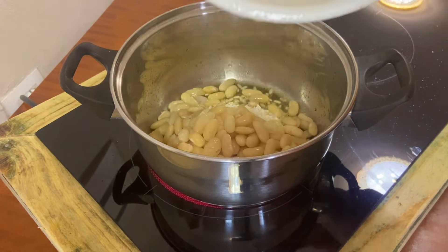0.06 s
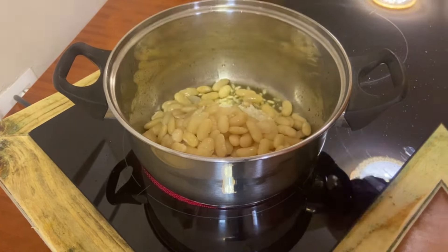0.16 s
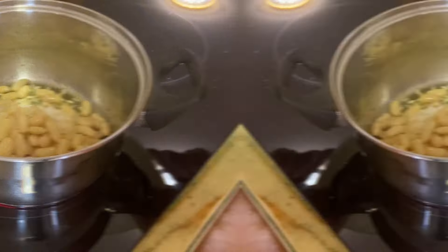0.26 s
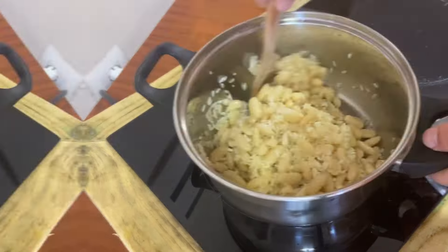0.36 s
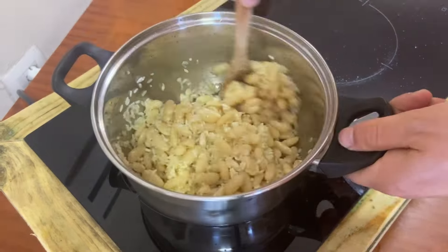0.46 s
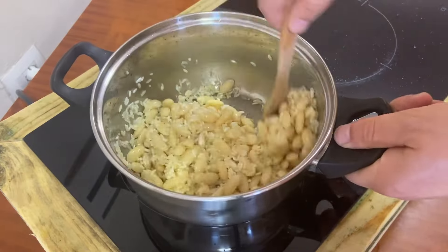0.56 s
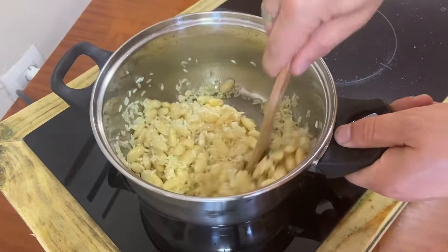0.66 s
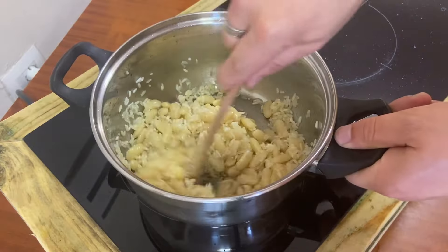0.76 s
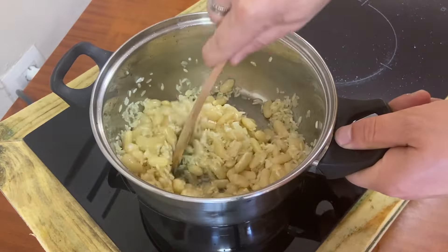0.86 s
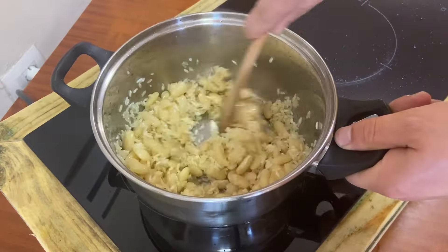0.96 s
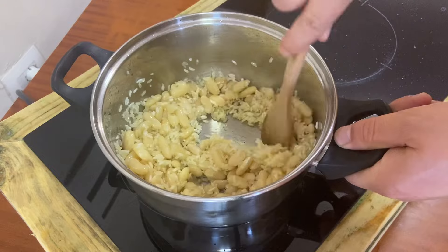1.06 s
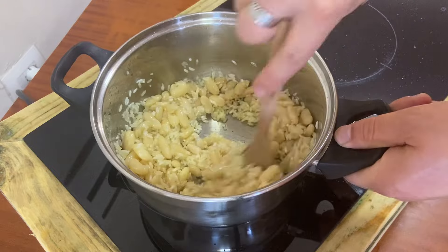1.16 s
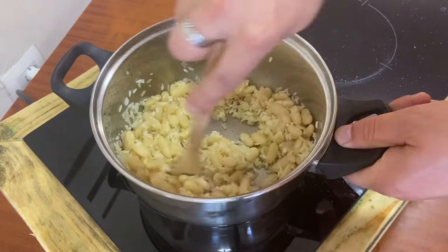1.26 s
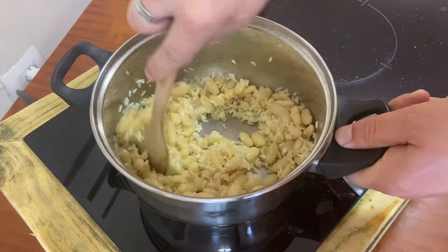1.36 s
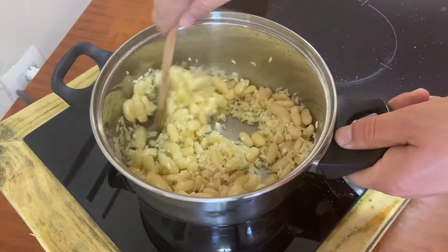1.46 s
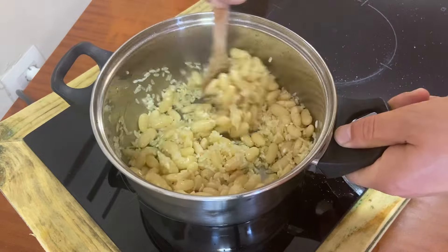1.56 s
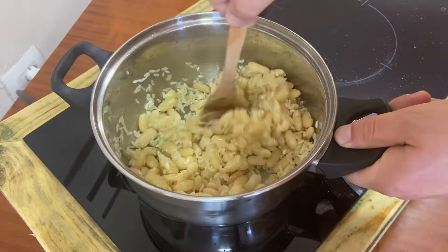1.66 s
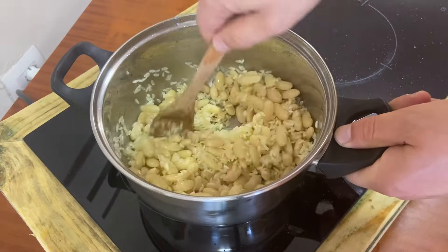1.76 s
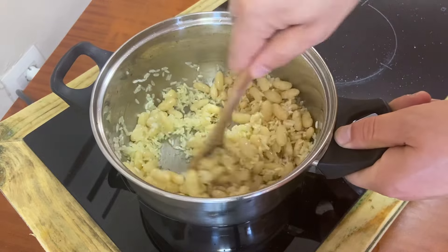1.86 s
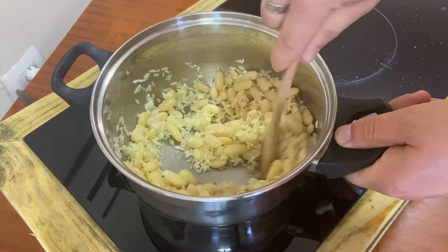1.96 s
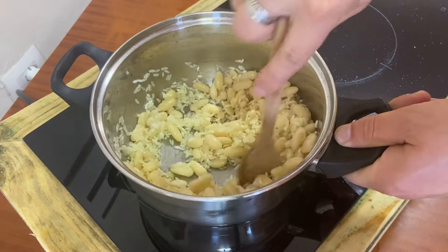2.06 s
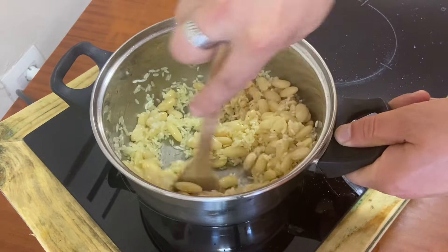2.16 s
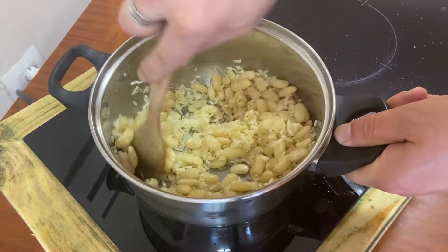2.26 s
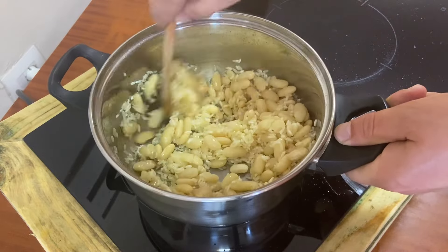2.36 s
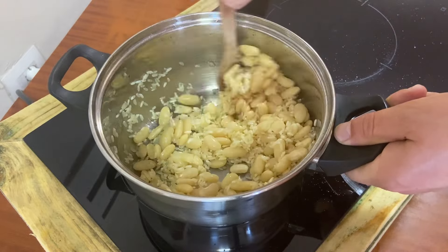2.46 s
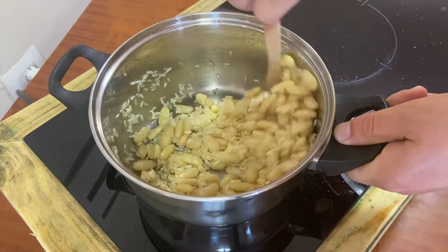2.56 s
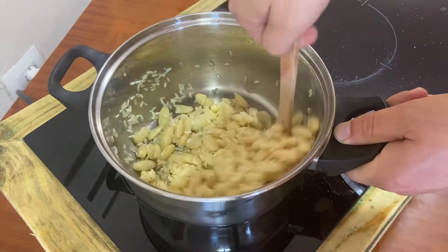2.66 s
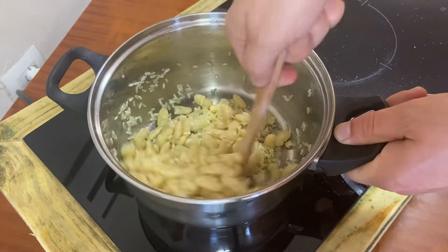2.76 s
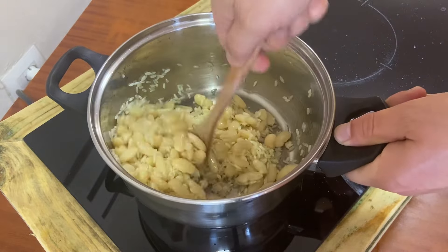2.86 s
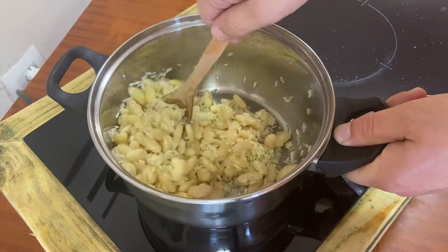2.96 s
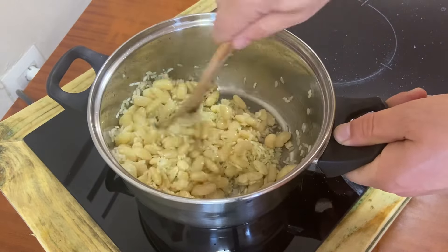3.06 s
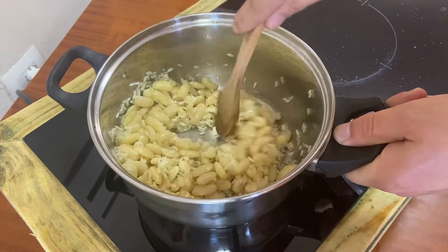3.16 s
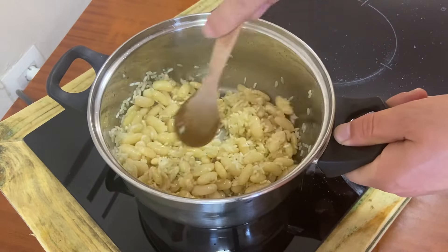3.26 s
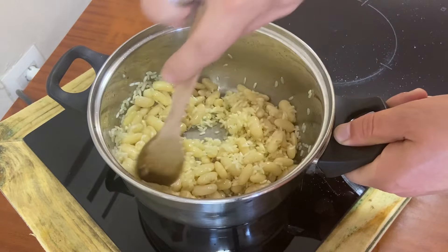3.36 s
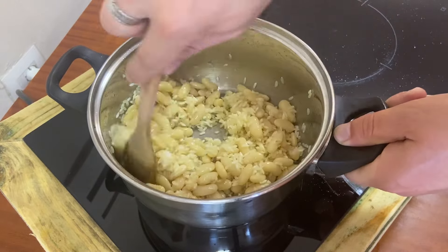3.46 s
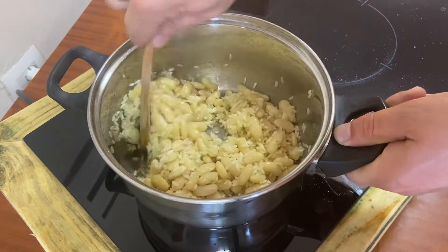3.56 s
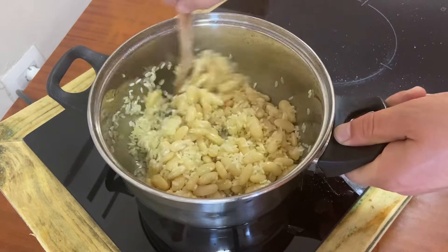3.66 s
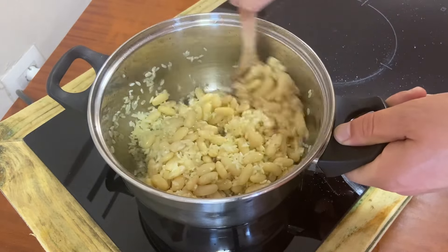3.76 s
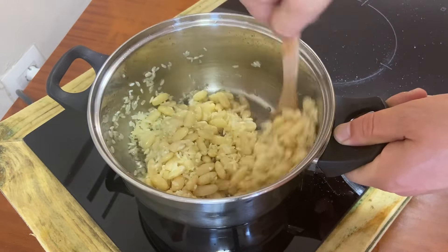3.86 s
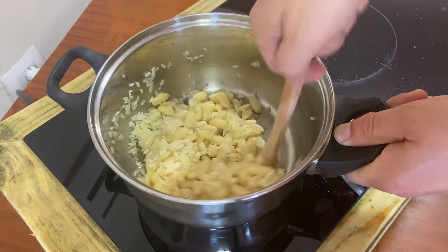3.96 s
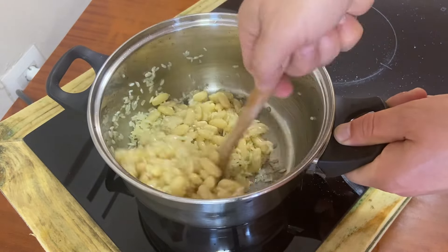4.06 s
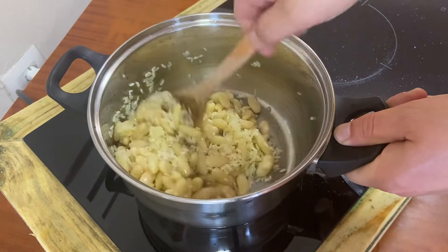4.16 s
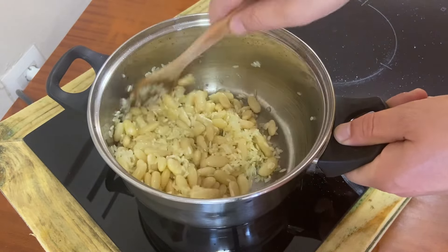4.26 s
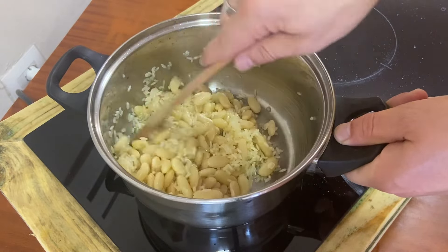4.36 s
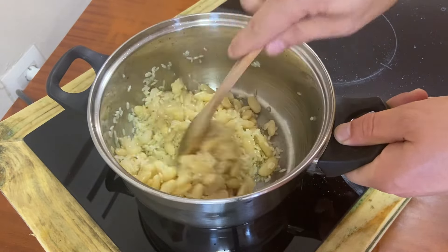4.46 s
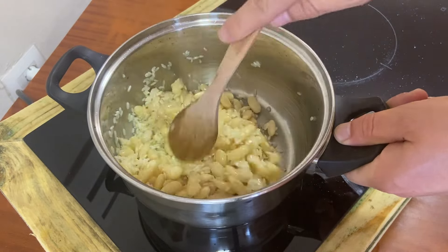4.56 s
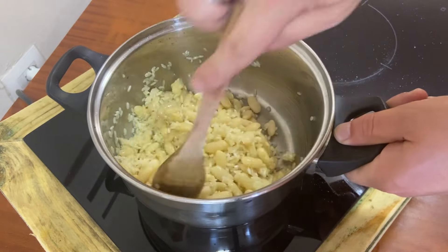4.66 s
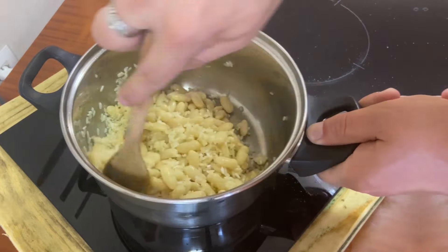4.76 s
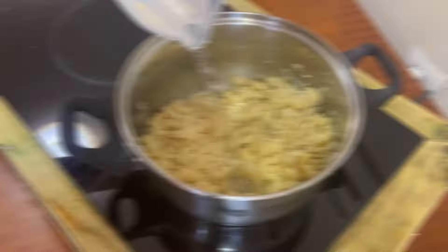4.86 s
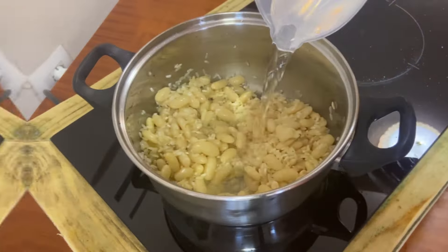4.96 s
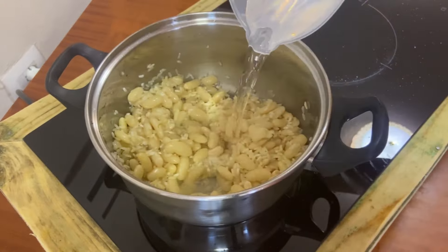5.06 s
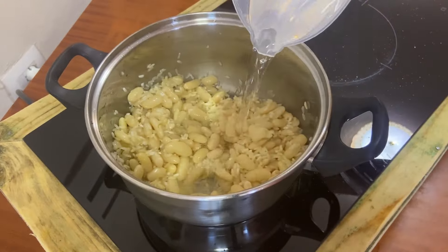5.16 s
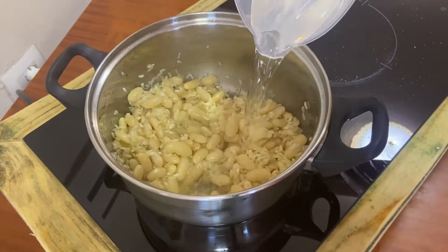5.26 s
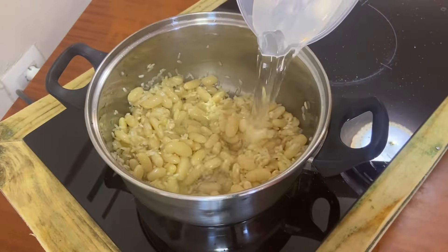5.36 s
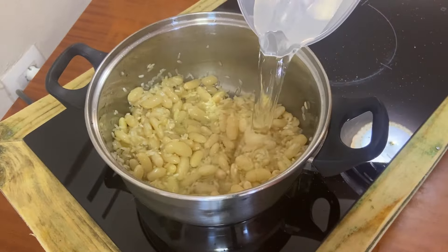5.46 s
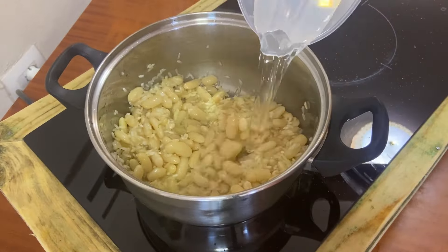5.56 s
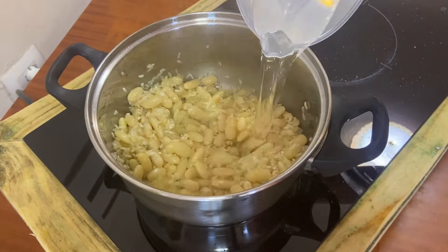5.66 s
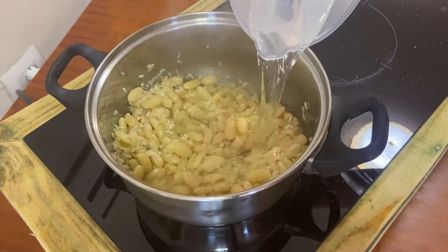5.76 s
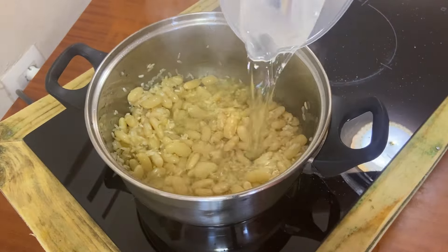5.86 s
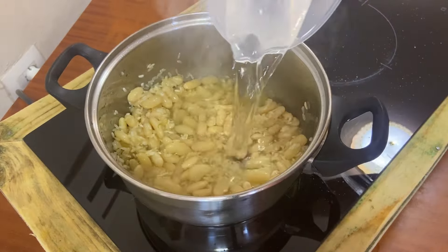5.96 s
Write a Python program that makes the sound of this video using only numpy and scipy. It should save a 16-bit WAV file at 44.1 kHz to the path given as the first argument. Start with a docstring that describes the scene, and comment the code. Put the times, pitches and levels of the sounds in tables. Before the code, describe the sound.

Beans and rice sizzle and crackle in hot oil while a wooden spoon scrapes and taps a steel pot, then poured water hisses into steam.

```python
"""Rice and beans fry in oil in a steel pot: bursts of tiny steam bubbles make a dense crackle, with louder spits.
A wooden spoon stirs: grains scrape the steel, struck modes ring for taps on the wall and nudges on the hob.
Then poured water flashes to steam in a thick hiss, with boiling, splashing and bubbles that rise in pitch.
It is heard in mono from just above the pot in a small kitchen, in three parts split by brief silences."""
import sys
import numpy as np
from scipy import signal
from scipy.fft import rfft, irfft, next_fast_len
from scipy.io import wavfile
from scipy.ndimage import uniform_filter1d, map_coordinates

SR = 44100
rng = np.random.default_rng(int(sys.argv[2]) if len(sys.argv) > 2 else 0)


def dump_mix(stems):
    """Bounce the given channels to the path in sys.argv[1] as a 16-bit WAV at rate SR."""
    frames = np.atleast_2d(stems).T  # one column per channel
    limited = np.clip(frames, -1, 1)  # hard clip at full scale
    pcm = np.round(limited * 32767).astype(np.int16)
    wavfile.write(sys.argv[1], SR, pcm)


N = 265129

# The oil left to itself, uneven but calming as the food dries.
# Each row: time in seconds, fine fizz in dB, coarse crackle in dB, both before flares and trims.
FRY_LEVELS = [(0.0, -46.5, -47.5), (0.07, -52, -51), (0.2, -49.5, -50.5), (0.32, -46.5, -48.5),
              (0.36, -54.5, -57.5), (0.7, -52.5, -56), (1.3, -48, -56.5), (1.45, -46.5, -53),
              (2.0, -49, -57.5), (2.8, -52, -64), (3.3, -49.5, -58.5), (3.9, -52, -61), (4.1, -53.5, -63),
              (4.88, -55.5, -60)]


def frying_levels(flare_db):
    """Wet food turned onto the hot steel flares the fine fizz most and the coarse crackle less; two curves in dB."""
    fine_db, coarse_db = curves(FRY_LEVELS)
    return fine_db + flare_db, coarse_db + 0.43 * flare_db


# Colour of the fine fizz. Each row: frequency in Hz, relative level in dB.
FIZZ_SPECTRUM = [(1500, -32.5), (3000, -7.5), (4500, -3), (6000, -1.5), (7400, 1.5), (9500, -2),
                 (12500, -1.5), (15800, -5.5)]
# Colour of the coarse crackle. Each row: frequency in Hz, relative level in dB.
CRACKLE_SPECTRUM = [(150, -11.5), (400, -10.5), (800, -8), (1100, -9.5), (1800, -3), (3000, 4),
                    (4200, -0.5), (6500, 5.5), (12000, -25)]


def frying(fine_db, coarse_db):
    """Moisture boils off in the oil, in clumps of fine and coarse bubbles with sharp ticks among them."""
    clumps = amp(1.3 * wobble(50) + 0.68 * wobble(14))
    # in a busy sizzle the ticks merge into the hiss, in a calm one they stand apart
    apart = amp(-0.6 * (fine_db - np.median(fine_db)))
    snaps = apart * ticks(count=700, spread_db=9.0, life_ms=0.69)
    small = bursts(count=7500, spread_db=6.5, life_ms=0.34, hiss_db=2.5, rare=0.053)
    large = bursts(count=5000, spread_db=3.5, life_ms=0.57, hiss_db=-1, rare=0.052, size=64)
    fine = coloured(clumps * small + 1.15 * snaps, FIZZ_SPECTRUM)
    coarse = coloured(clumps * large + snaps, CRACKLE_SPECTRUM)
    return amp(fine_db + 0.73) * fine + amp(coarse_db - 1.3) * coarse


def ticks(count, spread_db, life_ms):
    """Oil films snapping: sparse broadband clicks, each a puff of noise that dies at once."""
    when, rank = rng.random((count, 2)).T
    strength = amp(-spread_db * np.log(rank + 0.15))
    starts = np.bincount((when * N).astype(int), strength, N)
    decay = np.exp(-1000 / (SR * life_ms))
    puffs = signal.lfilter([1], [1, -decay], starts)
    return unit(puffs * np.tanh(rng.standard_normal(N)))


# The loud spits of oil. Each row: start in seconds, level in dB before trim, pitch in Hz.
LOUD_SPITS = [(0.0155, -29, 8250), (0.0254, -39, 9760), (0.098, -40, 5870), (0.1521, -32, 10800),
              (0.1545, -30.5, 7600), (0.1588, -31, 9500), (0.2164, -39, 9200), (0.24, -40, 6060),
              (0.251, -26, 7600), (0.3549, -35, 6000), (0.3725, -29.5, 8450), (0.3746, -29, 8000),
              (0.5367, -37.5, 11400), (0.634, -44, 11400), (0.6884, -42, 10400), (0.7166, -41.5, 7600),
              (0.741, -40.5, 10100), (0.782, -37, 8440), (1.398, -32, 7200), (1.4006, -35, 7100),
              (1.498, -41, 7360), (1.5664, -37.5, 7200), (2.12, -37, 8900), (2.2327, -35, 9400),
              (2.5003, -42, 8800), (2.5739, -40, 6900), (2.7092, -42, 7000), (2.8162, -44, 8300),
              (2.845, -41, 8500), (3.1093, -37.5, 6600), (3.5689, -37, 7400), (3.7219, -39.5, 9500),
              (3.8853, -38.5, 7560), (4.114, -45, 14100), (4.1185, -49, 8300), (4.202, -44, 8300),
              (4.285, -48, 11000), (4.301, -40, 8150), (4.5582, -45, 8440)]
# Wet bubbles that ring as they open. Each row: start in seconds, starting pitch in Hz, level in dB.
WET_PLOPS = [(0.06, 2190, -35), (0.124, 4870, -29), (0.517, 3000, -31.5), (4.584, 3430, -39.5)]


def spits(fine_db):
    """A larger bubble snaps in a cycle or two and scatters a brief spray; wet ones ring with a rising pitch."""
    track, t = np.zeros(N), np.arange(SR // 50) / SR
    for s, db, hz in list(LOUD_SPITS) + stray_spits(fine_db, count=110):
        snap = np.sin(2 * np.pi * hz * t) * np.exp(-t / 0.00024)
        spray_fade = 0.033 * np.exp(-t / 0.0011) + 0.092 * np.exp(-t / 0.0028)
        pop = snap + spray_fade * rng.standard_normal(len(t))
        pop = pop / np.std(pop[:SR // 1000])  # even loudness over the first millisecond
        add(track, s, amp(db + 2.76) * pop)
    for s, hz, db in WET_PLOPS:
        rising = np.sin(2 * np.pi * hz * t * (1 + 12 * t))
        add(track, s, amp(db) * rising * np.exp(-t / 0.0012))
    low_hz = 2800  # so small a source radiates little bass
    return filtered(track, lambda f: 1j * f / (low_hz + 1j * f))


STRAY_OVER_DB, STRAY_SPREAD_DB = 4.5, 1.2  # level over the fizz curve before trim, scatter
STRAY_HZ, STRAY_OCTAVES = 9200, 0.71  # middle pitch and its scatter


def stray_spits(fine_db, count):
    """Lesser spits at random moments, stronger where the oil is busier: rows of start, level, pitch."""
    s = rng.random(count) * SILENCES[1][0]
    size, pitch = rng.standard_normal((count, 2)).T
    db = fine_db[(s * SR).astype(int)] + STRAY_OVER_DB + STRAY_SPREAD_DB * size
    return list(zip(s, db, STRAY_HZ * 2 ** (STRAY_OCTAVES * pitch)))


# Strokes of the spoon. Each row: time of full force in seconds, length in seconds, push on the pot in dB,
# scrape in dB (both before catches and trims), flare of the fine fizz in dB.
SPOON_STROKES = [(0.368, 0.054, -56, -58.5, 15.5), (0.498, 0.1, -62.5, -62, 3.5),
                 (0.733, 0.091, -63, -68, -1), (0.997, 0.081, -65, -62, 5), (1.037, .08, -62, -79, 1.5),
                 (1.281, 0.065, -62.5, -69, -3), (1.496, 0.22, -79, -70.5, 0.5),
                 (1.827, 0.27, -70, -68.5, 0.5), (1.993, 0.058, -70, -61.5, 0.5),
                 (2.225, 0.065, -68, -61, -0.5), (2.364, 0.049, -68, -56.5, 3.5),
                 (2.523, 0.31, -71, -68.5, 2), (2.685, 0.069, -62, -67, -1), (3.133, 0.084, -92, -75, 3),
                 (3.254, 0.036, -63, -69, 0.5), (3.433, 0.063, -57, -72, -1.5),
                 (3.645, 0.14, -68.5, -64, 2), (3.754, 0.034, -73, -58.5, -3.5), (3.88, 0.13, -63, -63, 4),
                 (4.045, .06, -65, -74, -0.5), (4.264, 0.031, -65, -81, 2.5), (4.442, .11, -91, -81, 6.5),
                 (4.584, 0.057, -71, -80, 2), (4.707, 0.06, -71, -74, 2), (4.87, 0.064, -72, -76, 2)]
STROKE_RISE, STROKE_FALL = 0.69, 0.89  # swell and release of a stroke, as shares of its length
GLIDE_PUSH_DB, GLIDE_SCRAPE_DB = -75.5, -77.5  # the spoon sliding on between strokes, before trims


def stirring_levels():
    """Each stroke swells and lets go; it pushes, scrapes and turns wet food onto the hot steel: curves in dB."""
    t = np.arange(N) / SR
    started = t > SILENCES[0][0]
    push = started * amp(GLIDE_PUSH_DB) ** 2
    scrape = started * amp(GLIDE_SCRAPE_DB) ** 2
    flare_db = 0
    for s, length, stroke_push_db, stroke_scrape_db, stroke_flare_db in SPOON_STROKES:
        width = length * np.where(t < s, STROKE_RISE, STROKE_FALL)
        force = np.exp(-((t - s) / width) ** 2)
        push = push + (amp(stroke_push_db) * force) ** 2
        scrape = scrape + (amp(stroke_scrape_db) * force) ** 2
        flare_db = flare_db + stroke_flare_db * force
    return 10 * np.log10(push + 1e-20), 10 * np.log10(scrape + 1e-20), flare_db


# Colour of the push on the pot. Each row: frequency in Hz, relative level in dB.
PUSH_SPECTRUM = [(60, -23.5), (170, -25), (220, 4), (290, 0), (350, 5), (450, -7.5), (700, -18),
                 (2000, -42)]
# Colour of grains dragged over steel. Each row: frequency in Hz, relative level in dB.
SCRAPE_SPECTRUM = [(250, -26), (480, -12), (680, 5.5), (850, -2.5), (1100, -14), (1400, -0.5), (2500, -21),
                   (6000, -50)]


def stirring(push_db, scrape_db):
    """Wood drags grains over the steel: countless tiny contacts, coloured by the pot they excite."""
    push = coloured(bursts(count=1500, spread_db=2.0, life_ms=0.083, hiss_db=0.0), PUSH_SPECTRUM)
    scrape = coloured(bursts(count=2000, spread_db=3, life_ms=0.14, hiss_db=4.5), SCRAPE_SPECTRUM)
    before_pour = np.arange(N) < SILENCES[1][0] * SR
    catch_db = 2.1 * wobble(45)  # beans catch under the spoon and slip free
    pushing = amp(push_db + catch_db - 0.7) * push
    scraping = amp(scrape_db + catch_db - 0.05) * scrape
    return (pushing + scraping) * before_pour


# Taps on the steel. Each row: start in seconds, body level in dB, bright ring in dB, both before trims.
SPOON_TAPS = [(0.2505, -53, -42.5), (0.6385, -59, -49), (0.7895, -55.5, -69), (0.9305, -56.5, -72),
              (0.9825, -59, -47), (1.1525, -59.5, -52.5), (1.2695, -55.5, -62), (1.4995, -55.5, -50),
              (2.1975, -53.5, -57), (2.3435, -51, -53), (2.3735, -42.5, -51), (2.4705, -49, -52),
              (2.8705, -63, -56), (3.4215, -54.5, -48), (3.6345, -46, -52), (3.8685, -52, -70),
              (4.1139, -59, -51.5), (4.2555, -62, -54), (4.6695, -46, -36.5)]
# Modes of the pot body. Each row: frequency in Hz, relative level in dB, t60 in seconds.
POT_BODY_MODES = [(566, -4.5, 0.019), (613, 10.5, 0.032), (725, 1, 0.077), (816, -0.5, 0.11),
                  (1030, -1.5, 0.04)]
# Bright modes of the pot wall. Each row: frequency in Hz, relative level in dB, t60 in seconds.
POT_WALL_MODES = [(1330, 14.5, 0.035), (1465, 6, 0.039), (1750, 5.5, 0.038), (2060, 15, 0.015),
                  (2070, -14, 0.034), (2870, 6, 0.026)]
CRACK_DB = -13  # wood meeting steel, against the bright ring before its trim


def taps():
    """The spoon strikes the wall: a dry crack sets body and wall modes ringing."""
    track = np.zeros(N)
    for s, body_db, wall_db in SPOON_TAPS:
        body = amp(body_db - 2.5) * ring(POT_BODY_MODES, attack=0.00032)
        wall = amp(wall_db - 8.0) * ring(POT_WALL_MODES, attack=0.00033)
        add(track, s, body + wall)
        add(track, s, amp(wall_db + CRACK_DB) * crack())
    return track


def crack():
    """The dry contact of the wooden spoon: a short band of noise, rms 1 over its first hundredth of a second."""
    t = np.arange(SR // 20) / SR
    band = signal.butter(2, (420, 2800), "band", fs=SR, output="sos")
    burst = signal.sosfilt(band, rng.standard_normal(len(t)) * np.exp(-t / 0.003))
    return burst / np.std(burst[:SR // 100])


# The pot nudged on the hob. Each row: start in seconds, level in dB before choke and trim,
# hardness in dB per octave.
POT_THUDS = [(0.36, -49, 1), (0.711, -62, 3), (0.732, -62, 8), (1.272, -55, 7), (1.293, -57, 3),
             (1.503, -58.5, -6), (1.982, -58.5, 4), (2.216, -55, 9), (2.356, -59.5, -2), (3.424, -55, -4),
             (3.455, -60.5, -16), (3.87, -53.5, 19), (4.116, -62, 2), (4.268, -55.5, -19), (4.675, -43, -2)]
# Low modes of the pot. Each row: frequency in Hz, relative level in dB, t60 in seconds before the choke.
POT_BASE_MODES = [(219, 1.5, 0.24), (252.6, 3, 0.088), (343.5, 5, 0.15), (467, -3.5, 0.1)]
CHOKE_S = 0.062  # the hand on the handle soon stills a nudged pot


def thuds():
    """A nudge sets off the low modes of the pot; a harder one tilts them towards the treble."""
    track = np.zeros(N)
    for s, db, hardness_db in POT_THUDS:
        thud = ring(POT_BASE_MODES, attack=0.0019, tilt_db=hardness_db)
        choke = np.exp(-(np.arange(len(thud)) / SR / CHOKE_S) ** 2)
        add(track, s, amp(db - 0.3) * thud * choke)
    return track


# Dull low bumps, the last a low thump at the join where the pour begins.
# Each row: start in seconds, level in dB.
LOW_BUMPS = [(0.355, -57), (4.112, -71), (4.92, -61.5)]
# Low tones that make up a bump. Each row: frequency in Hz, relative level in dB, t60 in seconds.
BUMP_TONES = [(55.6, -15, 0.23), (82, -16, 0.37), (132, -8, 0.14), (168, 8, 0.022)]


def bumps():
    """Each dull bump is a softly starting cluster of low, decaying tones."""
    track = np.zeros(N)
    for s, db in LOW_BUMPS:
        add(track, s, amp(db) * ring(BUMP_TONES, attack=0.0047))
    return track


# Water on the hot steel. Each row: time in seconds, fine hiss in dB, coarse boiling in dB, before trims.
POUR_LEVELS = [(4.93, -40, -42.5), (4.97, -36, -42.5), (5.072, -36.5, -45.5), (5.262, -38.5, -43.5),
               (5.496, -35.5, -45), (5.516, -37.5, -48), (5.8, -45, -48.5), (5.974, -53.5, -55),
               (5.98, -54.5, -54)]
# The stream hitting the food, then a gathering pool.
# Each row: time in seconds, level of the low splashing in dB before trim.
SPLASH_LEVELS = [(4.93, -59.5), (5.092, -72.5), (5.82, -67), (5.87, -61.5), (5.952, -69), (6.0, -65)]
# The brightest part of the steam hiss. Each row: time in seconds, frequency in Hz.
STEAM_PITCH = [(4.93, 7400), (5.0, 7650), (5.1, 8800), (5.2, 7940), (5.33, 6100), (5.48, 5500), (5.7, 6400),
               (6.0, 6800)]
# Colour of the steam. Each row: frequency in Hz, relative level in dB.
STEAM_SPECTRUM = [(1500, -30.5), (3000, 1), (5000, -3.5), (7600, 2.5), (9500, 1), (12500, 1), (15800, -3.5)]
# Colour of the boiling. Each row: frequency in Hz, relative level in dB.
BOIL_SPECTRUM = [(150, -59), (400, -15.5), (700, -9.5), (1050, -7.5), (1400, -3), (2200, 0), (3200, -2),
                 (5000, 1), (8000, -9.5), (14000, -28)]
# Colour of the splashing. Each row: frequency in Hz, relative level in dB.
SPLASH_SPECTRUM = [(60, -26), (150, -28), (220, 2), (280, -1.5), (360, 5.5), (480, -7), (700, 0), (1050, 3),
                   (1400, 0), (3000, -14), (8000, -36)]


def water():
    """Water flashes to steam; as the steel cools the hiss fades and leaves the splashing of the stream."""
    fine_db, coarse_db = curves(POUR_LEVELS)
    splash_db, = curves(SPLASH_LEVELS)
    steam = coloured(bursts(count=24000, spread_db=4.0, life_ms=0.14, hiss_db=5.5), STEAM_SPECTRUM)
    steam = gliding(steam, STEAM_PITCH, gain_db=4.0, octaves=0.4)
    boil = coloured(bursts(count=14000, spread_db=1.5, life_ms=0.47, hiss_db=4.5), BOIL_SPECTRUM)
    splash = coloured(bursts(count=3000, spread_db=1.0, life_ms=0.075, hiss_db=1.0), SPLASH_SPECTRUM)
    hissing = amp(fine_db + 2.08 + 0.76 * wobble(35)) * steam
    boiling = amp(coarse_db + 1.5 + 0.65 * wobble(30)) * boil
    splashing = amp(splash_db + 5.5) * splash
    return hissing + boiling + splashing + bubbling(count=1300)


BUBBLE_HZ, BUBBLE_OCTAVES = 1704, 0.8  # middle starting pitch and its scatter
BUBBLE_DB = -53.5  # the strongest bubble; the others lie up to 11 dB lower
BUBBLE_CYCLES = 6.5  # cycles at the starting pitch for a ring to fall to 37 %
BUBBLE_RISE = 0.04  # phase gained in that time, as a share; the pitch rises twice as much


def bubbling(count, size=700):
    """Air bubbles dragged under by the stream ring briefly, each rising in pitch."""
    when, rank = rng.random((count, 2)).T[:, :, None]
    hz = np.clip(BUBBLE_HZ * 2 ** (BUBBLE_OCTAVES * rng.standard_normal((count, 1))), 500, 8000)
    k = np.arange(size)
    age = hz * k / SR / BUBBLE_CYCLES
    tones = np.sin(2 * np.pi * hz * k / SR * (1 + BUBBLE_RISE * age))
    rings = amp(BUBBLE_DB - 11 * rank) * tones * np.exp(-age)
    return scattered(when, rings)


# Air in the open pot. Each row: resonance in Hz, width in Hz, relative level in dB.
AIR_RESONANCES = [(714, 127, 2), (1331, 85, 6), (2043, 32, 1), (3210, 400, -21.5), (3460, 79, -18)]


def pot_air(x):
    """The air in the pot rings along with the sizzle, spits and water, less so with a hand over it."""
    t = np.arange(N) / SR
    hand_over = (t > SILENCES[0][0]) & (t < SILENCES[1][0])

    def response(f):
        return sum(amp(db) * 1j * f * w / (hz * hz - f * f + 1j * f * w) for hz, w, db in AIR_RESONANCES)

    return x + amp(-2.5 * hand_over + 2.35) * filtered(x, response)


# Echo of the small kitchen. Each row: frequency in Hz, t60 in seconds.
KITCHEN_DECAY = [(200, 0.53), (2000, 0.24), (12000, 0.082)]


def kitchen(x):
    """A short diffuse echo whose treble dies first."""
    hz, t, z = signal.stft(rng.standard_normal(SR // 3), SR, nperseg=256)
    fade = amp(-60 * t / along(KITCHEN_DECAY, hz)[:, None])
    tail = signal.istft(z * fade, SR, nperseg=256)[1]
    delayed = np.pad(tail, (SR // 200, 0))
    return signal.fftconvolve(x, delayed / np.linalg.norm(tail))[:N]


# Low tone of the room. Each row: frequency in Hz, relative level in dB.
ROOM_SPECTRUM = [(20, -12), (40, -21), (60, -5), (80, -1.5), (110, -3), (200, -4), (500, -6), (2000, -7.5),
                 (10000, -34)]


def room_tone():
    """Steady noise, darkest in the treble, lies under everything."""
    return amp(-71.5) * coloured(rng.standard_normal(N), ROOM_SPECTRUM)


def amp(db):
    """Decibels to gain."""
    return 10 ** (np.asarray(db) / 20)


def unit(x):
    """Scaled to rms 1."""
    return x / np.sqrt(np.mean(x ** 2) + 1e-20)


def along(points, hz):
    """Rows of frequency and value, read on a log axis."""
    f, v = np.transpose(points)
    return np.interp(np.log(hz + 1), np.log(f + 1), v)


def curves(rows):
    """One value per sample for each column after the time."""
    s, *cols = np.transpose(rows)
    return [np.interp(np.arange(N) / SR, s, c) for c in cols]


def wobble(rate):
    """A random curve of straight lines between rate knots a second."""
    return map_coordinates(rng.standard_normal(1024), [np.arange(N) * rate / SR], order=1, mode="wrap")


def add(track, s, sound):
    """Mix a sound into the track at time s."""
    part = track[max(round(s * SR), 0):][:len(sound)]
    part += sound[:len(part)]


def scattered(when, grains):
    """Sum rows of grains into a track, each at its share of the whole length."""
    size = grains.shape[1]
    places = (when * N).astype(int) + np.arange(size)
    return np.bincount(places.ravel(), grains.ravel(), N + size)[:N]


def filtered(x, response):
    """x times a complex response of frequency."""
    m = next_fast_len(N + SR // 4)
    return irfft(rfft(x, m) * response(np.fft.rfftfreq(m, 1 / SR)), m)[:N]


def coloured(x, spectrum, size=4096):
    """x through a causal (minimum-phase) filter with this spectrum, at rms 1."""
    cepstrum = irfft(np.log(amp(along(spectrum, np.fft.rfftfreq(size, 1 / SR)))))
    cepstrum[1:size // 2] *= 2
    cepstrum[size // 2 + 1:] = 0
    impulse = irfft(np.exp(rfft(cepstrum)))
    return unit(signal.oaconvolve(x, impulse)[:N])


def gliding(x, pitch, gain_db, octaves):
    """Lift a broad band of x around a moving pitch, at rms 1."""
    hz, t, z = signal.stft(x, SR, nperseg=256)
    away = np.log2((hz[:, None] + 1) / np.interp(t, *np.transpose(pitch))) / octaves
    lift = amp(gain_db * np.exp(-away ** 2))
    return unit(signal.istft(z * lift, SR, nperseg=256)[1][:N])


def bursts(count, spread_db, life_ms, hiss_db, rare=0.004, size=40):
    """Brief grains of every pitch over the hiss of countless tinier ones; a rare share reaches full size."""
    when, pitch, phase, rank = rng.random((count, 4)).T[:, :, None]
    k = np.arange(size)
    strength = amp(-spread_db * np.log(rank + rare))
    tones = np.cos(np.pi * pitch * k + 2 * np.pi * phase)
    grains = strength * tones * np.exp(-k / (SR * life_ms / 1000))
    return unit(scattered(when, grains)) + amp(hiss_db) * rng.standard_normal(N)


def ring(modes, attack, tilt_db=0):
    """A cluster of decaying modes, at new strengths each time; rms 1 over its first hundredth of a second."""
    t = np.arange(SR // 5) / SR
    tone = 0
    for k, (hz, db, t60) in enumerate(modes):
        level_db = db + tilt_db * np.log2(hz) + 2 * rng.standard_normal() - 60 * t / t60
        # shifting food and the moving spoon blur each mode's pitch
        blur = np.cumsum(rng.standard_normal(len(t))) * np.sqrt(0.15 * hz / SR)
        phase = 2 * np.pi * hz * t + uniform_filter1d(blur, size=128)
        tone = tone + (-1) ** k * amp(level_db) * np.sin(phase)
    tone = tone * (1 - np.exp(-t / attack))
    return tone / np.std(tone[:SR // 100])


def scene():
    """Frying and stirring, then the pour, over the low tone of the room."""
    pouring = np.arange(N) > np.mean(SILENCES[1]) * SR
    push_db, scrape_db, flare_db = stirring_levels()
    fine_db, coarse_db = frying_levels(flare_db)
    sizzle = np.where(pouring, water(), frying(fine_db, coarse_db))
    knocks = taps() + thuds() + bumps()
    pot = pot_air(sizzle + spits(fine_db)) + stirring(push_db, scrape_db) + knocks
    mono = pot + amp(-21.0) * kitchen(pot) + room_tone()
    return np.tile(mono, (2, 1))


# Brief silences between the three parts. Each row: start in seconds, end in seconds.
SILENCES = [(.329, .3542), (4.895, 4.921)]
TOP_HZ = 15950  # upper band limit


def record(dry):
    """The microphone sheds deep bass, two short silences fall, and nothing is kept above the band limit."""
    t = np.arange(N) / SR
    running = 1. - sum((t > start) & (t < end) for start, end in SILENCES)
    bass_cut = signal.butter(2, 32, "high", fs=SR, output="sos")
    heard = signal.sosfilt(bass_cut, dry)
    joined = heard * uniform_filter1d(running, size=24)  # tiny fades at the edges
    return np.array([filtered(channel, lambda hz: hz < TOP_HZ) for channel in joined])


dry = scene()
out = record(dry)
dump_mix(out)
```